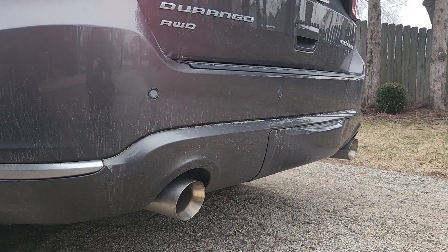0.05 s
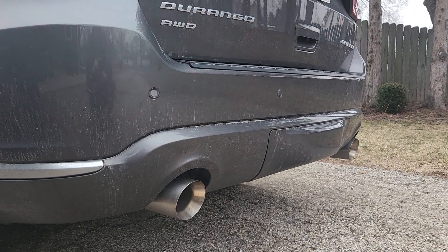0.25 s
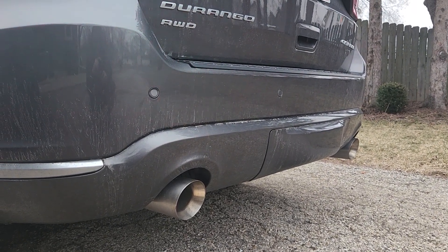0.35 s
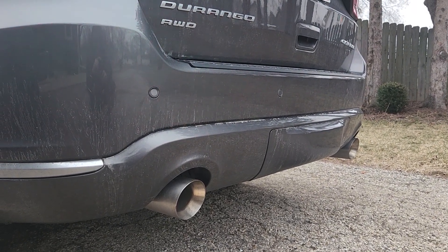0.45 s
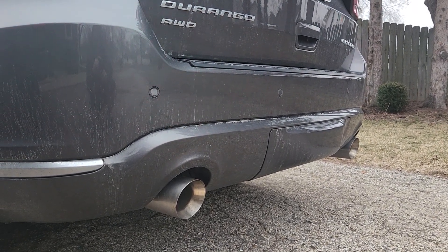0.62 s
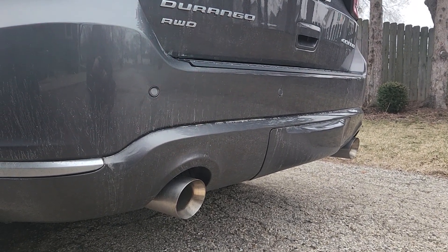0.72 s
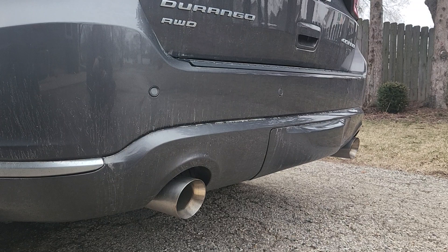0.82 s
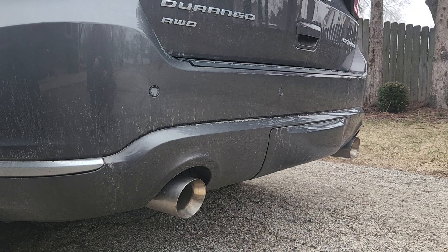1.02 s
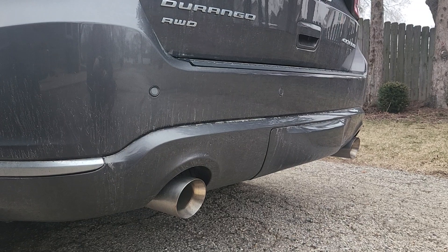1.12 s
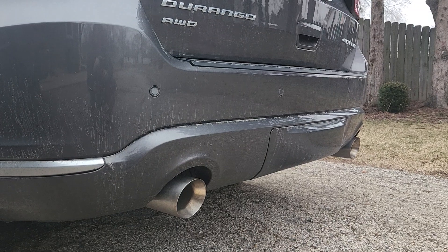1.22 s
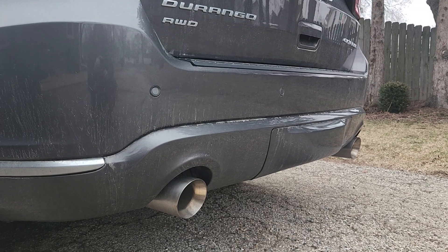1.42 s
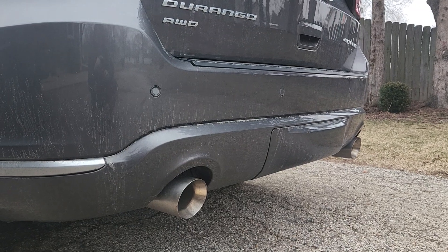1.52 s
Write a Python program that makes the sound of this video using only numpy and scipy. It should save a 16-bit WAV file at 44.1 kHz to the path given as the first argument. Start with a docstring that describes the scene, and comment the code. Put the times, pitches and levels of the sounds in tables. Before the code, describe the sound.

A car horn toots once, loud and brief, at about 0.2 seconds: two pitches together with a buzzy rattle, low thump and shuddering bodywork, echoing around an open yard until about 0.6. Far traffic rumbles steadily throughout. A bird warbles on the right from 0.75 to 1.1, ending in a trill. Sharp dry clicks come near 1.16 and 1.31, faint bird notes, then a rising chirp at 1.53.

```python
"""Far traffic rumbles under the whole scene: steady shaped noise. Small dry clicks, each a few very short
tones, and soft gliding bird notes come and go. Early on, a parked car gives one short toot: two horns, each a stack
of sines, with a noise rattle, a low thump and a shudder of the bodywork. The gravel yard returns the note
as echoes from fences and walls and as a dying wash of noise. Then a nearer bird, a gliding sine, warbles to
the right and ends in a trill; more clicks and soft notes follow, and last a louder rising chirp on the right."""
import sys
import numpy as np
from scipy import signal
from scipy.fft import rfft, irfft
from scipy.io import wavfile
from scipy.ndimage import uniform_filter1d, map_coordinates

SR = 44100
rng = np.random.default_rng(int(sys.argv[2]) if len(sys.argv) > 2 else 0)


def pcm_store(signal):
    """Save signal as 16-bit PCM."""
    levels = np.round(np.clip(np.atleast_2d(signal), -1, 1) * 32767)
    wavfile.write(sys.argv[1], SR, levels.astype(np.int16).T)


N = 68355
TIME_S = np.arange(N) / SR
SPECTRUM_HZ = np.arange(N // 2 + 1) * SR / N


def amp(db):
    """Turn decibels into a gain."""
    return 10 ** (np.asarray(db) / 20)


def rms_one(x):
    """Scale to an average strength (rms) of 1."""
    return x / np.sqrt(np.mean(x ** 2) + 1e-20)


def at_hz(points, hz):
    """Read a (Hz, value) table with straight lines on a log-frequency axis."""
    points = np.array(points)
    return np.interp(np.log(np.maximum(hz, 1)), np.log(points[:, 0]), points[:, 1])


def pan(db):
    """Left and right gains for a left-minus-right difference; positive is louder on the left."""
    return amp([[db / 2], [-db / 2]])


def band(x, low_hz, high_hz):
    """Keep the sound between two frequencies."""
    sos = signal.butter(2, [low_hz, high_hz], "band", fs=SR, output="sos")
    return signal.sosfilt(sos, x)


def drift(rate_hz):
    """Smooth random wandering around zero: a curve through two random points per cycle of the rate."""
    knots = rng.standard_normal(size=4000)
    return map_coordinates(knots, [4 + TIME_S * min(rate_hz, 1200) * 2], order=3)


def fade_db(s, db):
    """A level that moves in straight lines between points, and is almost silent outside them."""
    return np.interp(TIME_S, s, db, left=-120, right=-120)


def coloured(spectrum, channels):
    """Random noise shaped to a spectrum, rms 1, with nothing below the first frequency."""
    white = rfft(rng.standard_normal((channels, N)))
    shape = amp(at_hz(spectrum, SPECTRUM_HZ)) * (SPECTRUM_HZ > spectrum[0][0])
    return rms_one(irfft(white * shape, N))


def far_noise():
    """Steady stereo rumble and hiss of far traffic and yard; each half octave flickers a little."""
    level_db, flicker_db, flicker_hz = -38.5, 0.5, 8.3
    # noise spectrum: pitch_hz [Hz], level_db [dB per Hz, relative]
    far_spectrum = [(12, -27), (20, -13), (93, 2.5), (146, -12), (204, -13.5), (319, -29), (759, -25),
                    (1060, -25), (1610, -25.5), (1860, -31.5), (2020, -27.5), (2600, -40.5), (2820, -48.5),
                    (3530, -48), (4300, -46), (6720, -65), (16000, -100)]
    # how alike left and right are: pitch_hz [Hz], likeness [1 = same; 0 or less = unrelated]
    likeness = [(60, 1), (150, 1), (380, 0.72), (950, 0.61), (2380, 0.75), (5980, -0.84), (15000, 0.06)]
    # which side is louder: pitch_hz [Hz], left_minus_right_db [dB]
    side_lean = [(60, 3), (110, -0.5), (200, 1.0), (380, 1.5), (700, 1), (1290, -2.5), (2380, -9),
                 (4400, -8), (8120, -4.5), (15000, 22)]
    # which side is ahead: pitch_hz [Hz], left_lead [radians]; the second row's lead holds below it
    left_lead = [(0, 0), (690, -0.47), (2330, 5), (2580, 0), (3700, 10.5), (4910, 12), (5860, 11.5),
                 (6630, 21), (8870, 22), (9560, 27), (10800, 24.7), (11500, 11), (12700, 26.5), (15900, 27)]
    mid, side = rfft(coloured(far_spectrum, channels=2))
    alike = np.clip(at_hz(likeness, SPECTRUM_HZ), 0, 1)
    lean = amp(at_hz(side_lean, SPECTRUM_HZ) / 2) * np.exp(.5j * at_hz(left_lead, SPECTRUM_HZ))
    shared, apart = np.sqrt(1 + alike) * mid, np.sqrt(1 - alike) * side
    pair = np.array([(shared + apart) * lean, (shared - apart) / lean])
    half_octave = 2 * np.log2(np.maximum(SPECTRUM_HZ, 20) / 20)
    out = 0
    for k in range(21):
        weight = np.clip(1 - abs(half_octave - k), 0, 1)   # neighbouring bands overlap
        out = out + irfft(pair * weight, N) * amp(flicker_db * drift(flicker_hz))
    return amp(level_db) * rms_one(out)


def clicks():
    """Each dry click is a few ringing tones (modes) that swell and die within moments."""
    # clicks: time_s [s, 1 ms after the start], level_db [dB], pitch_share [times the mode pitch],
    # treble_tilt_db [dB per octave above the first mode], left_minus_right_db [dB]
    click_list = [(0.0234, -49.5, 2.32, -12, -17.5), (1.074, -57, 2, -13, 0), (1.141, -63, 2.5, -7, -10),
                  (1.1622, -29, 1.02, 0.2, -14.5), (1.177, -54, 2.4, -8, -15),
                  (1.308, -31.5, 0.98, -15, -14), (1.322, -55.5, 2.16, -21, -16)]
    # tones in a click: pitch_hz [Hz, before the pitch share], level_db [dB, before the tilt], swell_s [s]
    click_modes = [(2048, -2.5, 0.00081), (3670, -11.5, 0.0009), (5530, -6.5, 0.00033),
                   (8460, -14.5, 0.0003), (11440, -24.5, 0.00083), (14000, -32, .0003)]
    out, t = np.zeros((2, N)), np.arange(600) / SR
    lowest_hz = click_modes[0][0]
    for time_s, level_db, pitch_share, tilt_db, pan_db in click_list:
        tick = 0
        for hz, db, swell_s in click_modes:
            if hz * pitch_share >= SR / 3:   # leave out very high tones
                continue
            level = amp(db + tilt_db * np.log2(hz / lowest_hz))
            swell = (t / swell_s) ** 2 * np.exp(2 - 2 * t / swell_s)   # reaches 1 at swell_s
            tick = tick + level * swell * np.sin(2 * np.pi * hz * pitch_share * t)
        at = int((time_s - .001) * SR)
        out[:, at:at + len(t)] += amp(level_db) * tick * pan(pan_db)
    return out


def yard(x):
    """Blurred returns from all around: the sound is smeared by stereo noise that dies band by band."""
    level_pan_db, build_up_s = -1.5, 0.0067
    # dying time: pitch_hz [Hz], time_to_fall_60_db [s]
    dying_time = [(200, 0.13), (500, 0.51), (800, 0.33), (1000, 0.44), (1600, 0.63), (2000, 0.94),
                  (2500, 0.69), (3300, 0.6), (5500, 0.29), (9000, 0.24)]
    t = np.arange(SR // 2) / SR
    edges_hz = 140 * 2 ** np.arange(0, 7, .5)
    white = rng.standard_normal((2, len(t)))
    tail = 0
    for low_hz, high_hz in zip(edges_hz, edges_hz[1:]):
        fall_s = at_hz(dying_time, np.sqrt(low_hz * high_hz))
        tail = tail + band(white, low_hz, high_hz) * amp(-60 * t / fall_s)
    tail = tail * np.minimum(t / build_up_s, 1)
    tail = tail / np.sqrt(np.sum(tail ** 2) / 2)   # energy 1 per side on average
    return signal.fftconvolve(x, tail, axes=1)[:, :N] * pan(level_pan_db)


def birds():
    """Bird voices are gliding sines: a near warble with a trill, and short notes with chance flicker."""
    trill_hz, trill_from_s = 54.8, .92
    trill_pitch_share, trill_level_depth = 0.027, .85
    song_pan_db, song_gain_db = -12, 1.5
    # near warble: time_s [s], pitch_hz [Hz, before the trill], level_db [dB, before the song gain and trill]
    song = [(.745, 2050, -72), (.755, 2250, -58), (.769, 2400, -47), (.79, 2600, -54), (0.799, 2750, -58),
            (.805, 2650, -59.5), (.815, 2450, -44.5), (0.824, 2450, -62), (0.848, 2550, -58),
            (.865, 2220, -52), (.883, 2150, -48.5), (.895, 2085, -65), (.905, 2150, -60), (.915, 2083, -59),
            (.933, 2183, -58.5), (.96, 2200, -54.5), (.98, 2270, -54.5), (1.004, 2320, -52),
            (1.021, 2270, -58.5), (1.045, 2250, -55), (1.074, 2200, -85), (1.12, 2200, -59)]
    # short notes, soft except the last, a louder rising chirp on the right: start_s [s], length_s [s],
    # from_hz [Hz], to_hz [Hz], flicker_hz [Hz, at most 1200 used], level_db [dB], left_minus_right_db [dB]
    notes = [(0.049, 0.041, 2390, 3100, 6.9, -66, -3), (0.091, 0.17, 3140, 2830, 150, -65, 17.5),
             (.112, 0.04, 6400, 5470, 32, -72, -21), (0.788, 0.09, 4440, 3890, 370, -63, -5),
             (.83, 0.085, 3440, 3500, 170, -65.5, 12), (0.932, 0.059, 4000, 4000, 280, -80, .1),
             (1.237, 0.057, 2770, 2760, 27, -67, 20), (1.274, .016, 5640, 5730, 59, -70.5, -14),
             (1.281, .08, 5750, 5270, 570, -68.5, -11), (1.329, 0.052, 2820, 2720, 25, -64, 13),
             (1.325, 0.068, 4080, 3890, 170, -68.5, 7), (1.373, 0.11, 4260, 4440, 350, -69, -9),
             (1.42, .11, 5770, 5830, 250, -81.5, -16), (1.528, 0.048, 2150, 2545, 18.3, -45.5, -12)]
    s, hz, db = np.transpose(song)
    trill_on = TIME_S > trill_from_s
    trill = trill_pitch_share * np.sin(2 * np.pi * trill_hz * TIME_S) * trill_on
    pitch_hz = np.interp(TIME_S, s, hz) * (1 + trill)
    voice = np.sin(2 * np.pi * np.cumsum(pitch_hz) / SR)
    pulses = 1 + trill_level_depth * np.cos(2 * np.pi * trill_hz * (TIME_S - 1.0)) * trill_on
    out = amp(fade_db(s, db + song_gain_db)) * voice * pan(song_pan_db) * pulses
    for start_s, length_s, from_hz, to_hz, flicker_hz, level_db, pan_db in notes:
        u = np.clip((TIME_S - start_s) / length_s, 0, 1)   # 0 to 1 through the note
        pitch_hz = from_hz + (to_hz - from_hz) * u
        swell = np.sqrt(np.sin(np.pi * u) + 1e-12)
        voice = np.sin(2 * np.pi * np.cumsum(pitch_hz) / SR)
        out = out + amp(level_db) * drift(flicker_hz) * swell * voice * pan(pan_db)
    return out


def swing_db(late_s):
    """How far the horn diaphragms swing over time, delayed and smoothed."""
    # swing of the diaphragms: time_s [s, before the delay], swing_db [dB]
    swing_points = [(.18, -45), (.195, -4.5), (0.209, -1.5), (0.217, 0.75), (0.231, -2.5), (0.245, -6.5),
                    (0.263, -19.5), (.30, -42), (.36, -84)]
    swing = np.interp(TIME_S - late_s, *np.transpose(swing_points), left=-120, right=-120)
    return uniform_filter1d(swing, size=150)


def horn(base_hz, partials):
    """A vibrating diaphragm: sines at multiples of one pitch that swell and die with its swing."""
    waver_share, waver_hz = 0.0024, 24.6
    rise_per_s, rise_mid_s = .4, .222   # the pitch climbs a little within 0.03 s of the middle
    steepen_per_khz = 0.044             # high partials need more swing
    rise = rise_per_s * np.clip(TIME_S - rise_mid_s, -.03, .03)
    pitch_hz = base_hz * (1 + waver_share * drift(waver_hz) + rise)
    turn = 2 * np.pi * np.cumsum(pitch_hz) / SR
    out = 0
    for multiple, db, pan_db, left_lead, late_s in partials:
        k = round(multiple)
        steepness = 2 + steepen_per_khz * k * base_hz / 1000
        level = amp(db + 4 + steepness * swing_db(late_s))
        phase = np.array([[left_lead], [0]]) + rng.uniform(0, 2 * np.pi)
        out = out + level * np.sin(k * turn + phase) * pan(pan_db)
    return out


def buzz():
    """Bright noise of rattling contacts and panels under the note, dying away after it."""
    # rattle spectrum: pitch_hz [Hz], level_db [dB per Hz, relative]
    rattle_spectrum = [(1470, -16.5), (2500, 0), (2600, -19), (2870, -8), (3390, -10.5), (5750, -12),
                       (7800, -20), (8950, -16), (15500, -29.5)]
    # rattle level: time_s [s], level_db [dB, before mixing the noises]
    rattle_level = [(.18, -83), (.2, -47.5), (0.215, -33.5), (0.227, -30.5), (0.244, -39), (.266, -42.5),
                    (.32, -52), (.38, -69), (.5, -87)]
    noise = coloured(rattle_spectrum, channels=3)
    mixed = 0.56 * noise[0] + 1.296 * noise[1:]   # one noise shared by both sides, plus one for each
    return amp(fade_db(*np.transpose(rattle_level))) * mixed * pan(2)


def thump():
    """A few cycles of a low tone as the current comes on."""
    pitch_hz, start_s, length_s, level_db = 226, .183, 0.043, -26.5
    u = np.clip((TIME_S - start_s) / length_s, 0, 1)
    return amp(level_db) * np.sin(np.pi * u) * np.sin(2 * np.pi * pitch_hz * length_s * u)


def bodywork():
    """Low noise that shudders through the car's panels, lasting past the toot."""
    low_hz, high_hz, low_share = 99, 630, 1.37
    # shudder level: time_s [s], level_db [dB]
    shudder_level = [(0.201, -78), (0.234, -30.5), (.27, -34), (.30, -33), (0.329, -32.5), (.36, -43.5),
                     (0.384, -40)]
    wide = band(rng.standard_normal(N), low_hz, high_hz)
    deep = band(rng.standard_normal(N), low_hz, 2 * low_hz)
    return amp(fade_db(*np.transpose(shudder_level))) * rms_one(wide + low_share * deep)


def echoes(x):
    """Separate late copies from hard surfaces, each favouring one band of pitches."""
    spread = 1.12   # band edge divided by band centre
    # echoes: delay_s [s], level_db [dB], centre_hz [Hz], left_minus_right_db [dB]
    echo_list = [(0.034, -8.5, 1400, -10.5), (.045, -19.5, 940, 10), (0.053, -11, 2270, -13),
                 (0.095, -13, 2110, -12), (.10, -23, 2300, 1), (0.12, -20.5, 1610, -13),
                 (.205, -27.5, 2050, -8), (.275, -23.5, 4100, -13), (.275, -30, 6050, -14.5),
                 (.15, -26, 2300, -11), (.20, -26.5, 2360, -5), (0.032, -7.5, 2420, -10),
                 (.285, -33, 1540, -13), (.28, -25.5, 2160, -9)]
    out, mono = np.zeros((2, N)), x.mean(axis=0)
    for delay_s, level_db, centre_hz, pan_db in echo_list:
        at = int(delay_s * SR)
        returned = band(mono, centre_hz / spread, centre_hz * spread)
        out[:, at:] += amp(level_db) * pan(pan_db) * returned[:N - at]
    return out


def scene():
    """Add far noise, clicks, birds, the two horns with their side sounds, and all the returns."""
    # partials of each horn as they arrive round the car: multiple [times the pitch],
    # level_db [dB, relative], left_minus_right_db [dB], left_lead [radians], delay_s [s]
    low_partials = [(1, -30, 0.5, -0.79, 0.006), (2, -15, 1.3, -0.93, 0.0052), (3, -21, 2.5, 0.93, 0.005),
                    (4, -19, -4.5, -0.77, 0.014), (5, -25.5, 1.5, -1.93, 0.0087),
                    (6, -38, -10, 0.72, 0.014), (7, -34.5, 5.5, 1.1, 0.023), (8, -40.5, 15, 0.95, 0.016),
                    (9, -46, -1, 0.19, 0.0063), (10, -42.5, 0, -1.5, 0.0087), (11, -46, 5, -2.3, 0.0078),
                    (13, -56, 0, -1.4, 0.011), (15, -57, 2, 0.78, 0.015), (12, -43.5, -6.5, -2.4, 0.012),
                    (14, -46, -15.5, -0.77, 0.016)]
    high_partials = [(1, -20.5, -3.5, -0.9, 0.00043), (2, -17.5, 0.5, 0.55, 0.003),
                     (3, -26.5, -1.5, -1.3, 0.0024), (4, -25, -7, -2.5, 0.015), (5, -30, -7.5, 1.9, 0.0067),
                     (6, -36.5, 9, -0.6, 0.012), (7, -50, -2, -4, 0.012), (8, -40, -0.5, -2.9, 0.015),
                     (9, -52, -3, 3.5, 0.0068), (11, -50, -3, 4, 0.012), (12, -55, 2, 5, 0.021)]
    ticks, song = clicks(), birds()
    toot = horn(397.7, low_partials) + horn(485.6, high_partials)   # base pitches in Hz
    rattle = buzz()
    # how much of each sound feeds the yard, in dB
    toot_wet_db, rattle_wet_db, bird_wet_db, click_wet_db = -18, -12, -9, -29
    to_yard = amp(toot_wet_db) * band(toot, 60, 2700) + amp(rattle_wet_db) * rattle
    to_yard = to_yard + amp(bird_wet_db) * song + amp(click_wet_db) * ticks
    car = toot + rattle + thump() + bodywork()
    returns = echoes(toot + rattle) + yard(to_yard)
    return far_noise() + ticks + song + car + returns


def record(dry):
    """Round off the peaks gently, then cut the highest treble."""
    top, cutoff_hz = 0.99, 16390
    rounded = top * np.tanh(dry / top)
    return signal.sosfilt(signal.cheby2(12, 70, cutoff_hz, fs=SR, output="sos"), rounded)


dry = scene()
out = record(dry)
pcm_store(out)
```